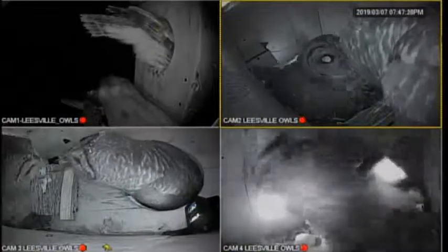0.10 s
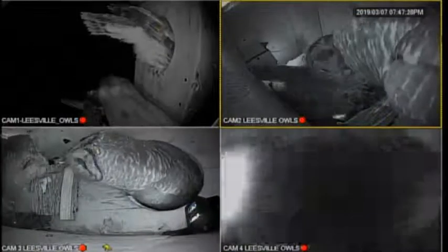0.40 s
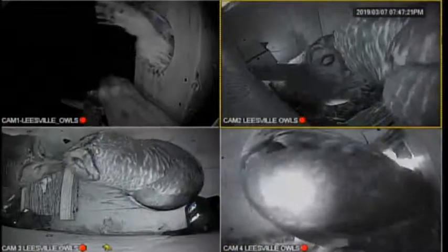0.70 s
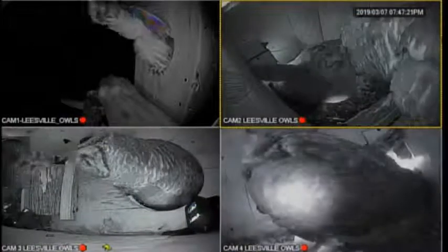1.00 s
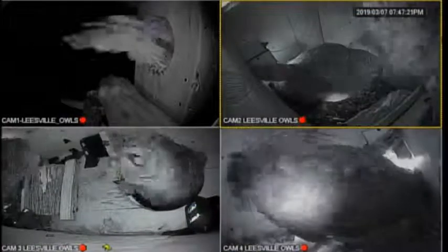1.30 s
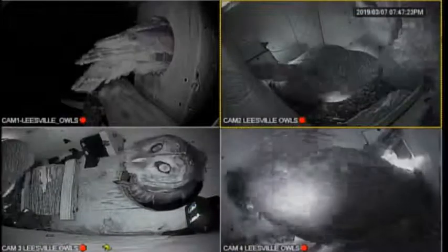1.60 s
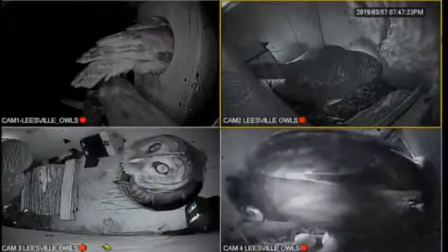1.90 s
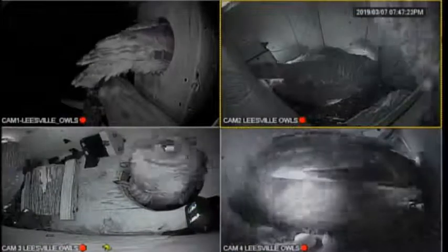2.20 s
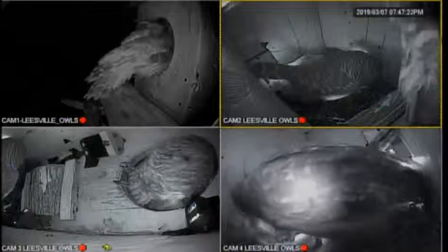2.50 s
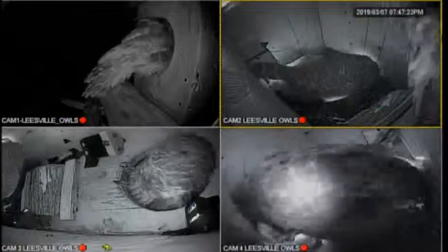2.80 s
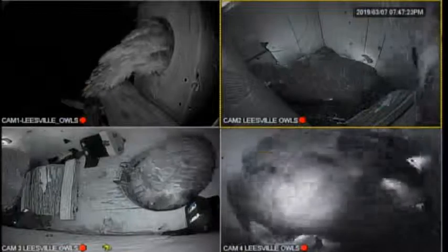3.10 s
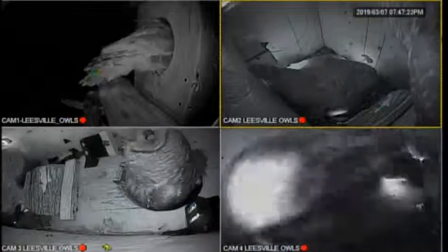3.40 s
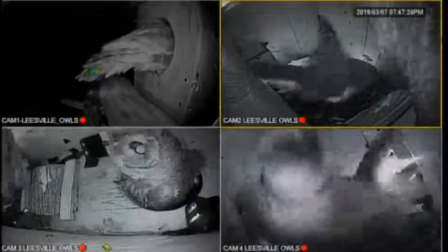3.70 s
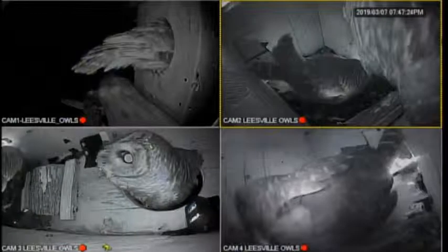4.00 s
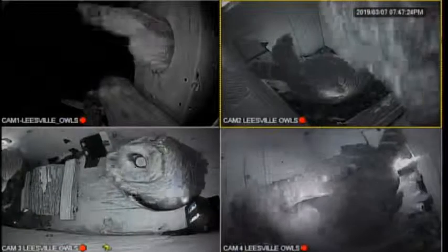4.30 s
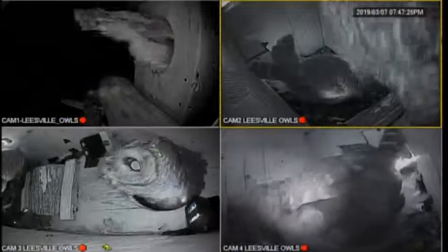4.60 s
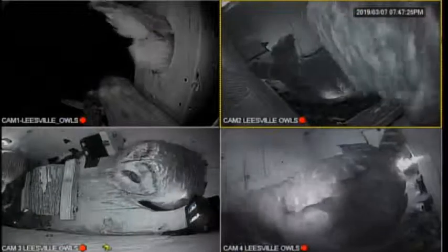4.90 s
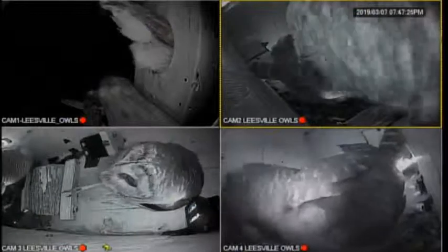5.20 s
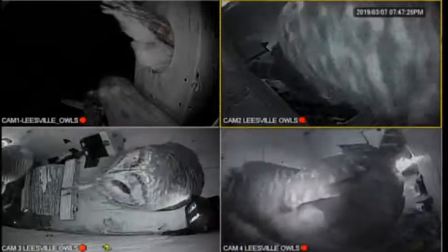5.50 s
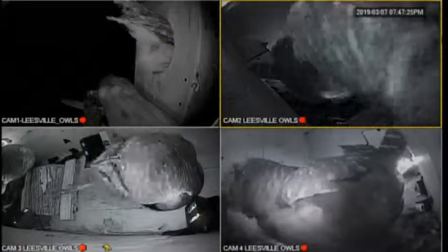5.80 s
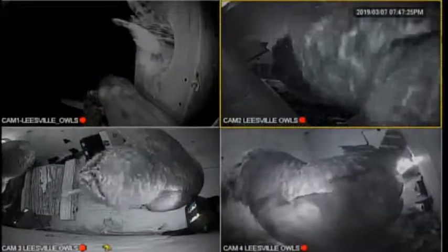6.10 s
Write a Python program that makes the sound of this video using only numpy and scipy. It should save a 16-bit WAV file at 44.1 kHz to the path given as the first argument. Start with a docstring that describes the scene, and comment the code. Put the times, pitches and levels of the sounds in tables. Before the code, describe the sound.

Two owls duet loudly in a wooden nest box at night. One gives a run of short arching hoots that climb in pitch and end in a drawn-out hoot, while the other shrieks and squeals over it. After a lull with faint claw ticks, a level whine and a squeal overlap more hoots, closing on a long one. The small close microphone overloads, making the calls raspy over faint hiss and low rumble.

```python
"""Two owls duet at a wooden nest box at night, over low rumble and faint hiss. One starts with short arching
hoots, a membrane pulsing through a swollen throat. The other squeaks, shrieks over it and cracks into a
squeal. The box rings; a small microphone overloads, so the hoots rasp and the voices mix. Claws tick on
the wood, and at 1.9 s a hoot is drawn out. From 3 s a level whine leads to a second squeal over more
hoots. A last long hoot and two ticks follow."""
import sys
import numpy as np
from scipy import signal
from scipy.fft import rfft, irfft
from scipy.io import wavfile
from scipy.ndimage import map_coordinates

SR = 44100
rng = np.random.default_rng(int(sys.argv[2]) if len(sys.argv) > 2 else 0)


def persist_wave(psi):
    """Save psi, clipped to +-1, as 16-bit WAV."""
    counts = np.round(np.clip(psi, -1, 1) * 32767).astype(np.int16)
    wavfile.write(sys.argv[1], SR, np.atleast_2d(counts).T)


N = 269892
T = np.arange(N) / SR
FREQS = np.arange(N // 2 + 1) * SR / N

# night air spectra: f/Hz, relative density/dB
RUMBLE_SPECTRUM = [(15, -77), (25, -79), (41, -25), (81, -3), (137, -2), (184, -23.5), (226, -20.5),
                   (358, -42), (461, -20.5), (522, -28), (700, -55), (910, -52), (1540, -120)]
HISS_SPECTRUM = [(410, 4), (700, 0), (872, -0.5), (1390, 0.5), (2000, -2), (2490, 8.5), (2890, -6),
                 (3600, 0.5), (4480, -10.5), (4940, -7.5), (13000, -13.5), (16800, -64), (22000, -120)]
# short hoots: start/s, crest/s, end/s, crest f/Hz, level/dB
SHORT_HOOTS = [(.079, 0.137, .212, 241, 10), (0.429, 0.494, .565, 214.5, 5), (0.795, 0.853, .925, 216.2, 4),
               (1.121, 1.18, 1.25, 332.2, 13), (1.426, 1.489, 1.578, 361.7, 17.5),
               (1.754, 1.814, 1.905, 360.3, 16.5), (3.348, 3.402, 3.535, 287.4, 9.5),
               (4.368, 4.46, 4.552, 328.7, 9.5), (4.786, 4.854, 4.975, 345.3, 11),
               (5.177, 5.241, 5.325, 346, 15)]
# swollen throat: f/Hz, gain/dB
THROAT_RESPONSE = [(120, 6), (170, 1), (240, -7.5), (330, -7.5), (390, -7), (460, 0), (590, 2.5),
                   (730, -4.5), (880, -13), (1060, -10), (1300, -9.5), (1650, -14.5), (3000, -45.5),
                   (6000, -31)]
# first wall reflections: delay/s, gain/dB
WALL_ECHOES = [(.0021, -13.5), (.00425, -16.5), (.0083, -35.5)]
# air modes of the box: f/Hz, gain/dB, t60/s
BOX_AIR_MODES = [(236, -10, 0.22), (486, -29, 0.96), (672, -21.5, 0.2)]
# pitch contours, one per call: t/s, f/Hz
SQUEAK_PITCH = [(.282, 3940), (.303, 4480)]
SHRIEK_PITCH = [(0.296, 1557), (0.344, 1554), (0.358, 1510), (0.396, 1510), (0.428, 1572), (0.552, 1527),
                (0.612, 1655), (0.65, 1648), (0.696, 1713), (0.758, 1625), (0.792, 1637), (0.885, 1745)]
SQUEAL_PITCHES = [
    [(0.88, 683), (0.9, 663), (1.006, 759), (1.072, 772), (1.122, 748), (1.14, 620)],
    [(3.637, 822.5), (3.771, 780.6), (3.819, 601.1), (3.835, 645)],
]
LONG_HOOT_PITCHES = [
    [(1.905, 124), (1.927, 174.7), (1.955, 246), (1.981, 269.2), (2.047, 299.7), (2.257, 250),
     (2.277, 220.8), (2.325, 160.3)],
    [(3.515, 204.7), (3.549, 250.1), (3.603, 273.8), (3.777, 260.6), (3.819, 246), (3.853, 219)],
    [(3.853, 119.3), (3.971, 158.3), (4.021, 171), (4.055, 151.3), (4.1, 118)],
    [(5.32, 129.7), (5.39, 240.3), (5.48, 358.6), (5.514, 372.2), (5.564, 336), (5.658, 240.4),
     (5.692, 247.2), (5.722, 212), (5.765, 154)],
]
WHINE_PITCH = [(2.96, 877.3), (3.008, 907.7), (3.078, 926.6), (3.356, 953.4), (3.392, 947.1),
               (3.432, 962.6), (3.546, 962.0), (3.558, 995.8), (3.58, 1008)]
# partials: multiple of pitch, level/dB
SHRIEK_LINES = [(1, 7), (2, -2), (3, -12), (4, -27), (5, -21)]
HALF_PITCH_LINES = [(.5, -32), (1.5, 22), (2.5, 2), (3.5, -35)]
SQUEAL_LINES = [(1, 12.5), (2, 9.5), (3, 22), (4, 4), (5, -2), (6, 0), (7, -5), (8, -0.5), (9, 2.5),
                (10, 3)]
WHINE_LINES = [(1, 5), (2, 0), (3, 3.5), (4, -22), (5, -65), (6, -13.5), (7, -25), (8, -31)]
# period doublings in the shriek: centre/s, length/s, half-pitch gain/dB
PERIOD_DOUBLINGS = [(0.343, 0.12, -18.5), (0.545, 0.079, -20.5), (0.777, 0.044, -12)]
# per squeal: level/dB, catch time/s
SQUEAL_SETTINGS = [(9, 0.13), (4.5, 0.0064)]
# clearest claw strikes: t/s, relative level/dB
CLAW_STRIKES = [(1.6033, -28), (2.388, -35), (2.4488, -27), (2.7536, -35), (2.8355, -27), (4.6518, -33),
                (5.8865, -28), (5.9643, -29)]
# scrape force: f/Hz, level/dB
SCRAPE_SPECTRUM = [(1000, -18), (2300, -3), (4000, -3), (7000, -17)]
# wood modes: f/Hz, gain/dB, t60/s
WOOD_MODES = [(2490, 2.5, 0.019), (2820, 1.5, .03), (3230, -3, 0.033), (3640, -5, 0.02)]
# per long hoot: level/dB, odd-harmonic gain/dB, roughness/0-1, fade/(dB/s)
LONG_HOOT_SETTINGS = [(17, 2, 0.2, -18), (20, -23.5, 0.39, -37), (15.5, 0.5, 0.22, -14), (18, 0, 0.38, -21)]
# overloaded microphone: f/Hz, gain/dB
MIC_RESPONSE = [(40, -29.5), (120, -15), (250, 2.5), (350, 3), (550, -1), (1000, 1.5), (1700, 2.5),
                (2600, -0.5), (4000, -1.5), (6300, -1.5), (8000, -6), (13000, -3)]
# right channel re left: f/Hz, gain/dB, lag/rad
RIGHT_RESPONSE = [(203, -20, -1.5), (500, -7, -2.5), (815, -6.5, -3), (1970, -6.5, -2.5),
                  (3310, -5.5, -2.5), (6240, -10.5, 0.5), (12300, -11, 1.6)]


def amp(db):
    """dB to gain."""
    return 10 ** (np.asarray(db) / 20)


def unit(x):
    """Scale to rms 1."""
    return x / np.sqrt(np.mean(x ** 2))


def at_hz(table, hz):
    """Interpolate (f/Hz, value) rows on a log-frequency axis."""
    points_hz, values = np.transpose(table)
    return np.interp(np.log(np.maximum(hz, 1)), np.log(points_hz), values)


def colour(x, table):
    """Filter by (f/Hz, gain/dB) rows."""
    return irfft(rfft(x) * amp(at_hz(table, FREQS)), N)


def wander(t, rate_hz):
    """Smooth noise, deviation near 1."""
    knots = rng.standard_normal(4096)
    return map_coordinates(knots, [(t - t[0]) * rate_hz], order=3, mode="wrap")


def span(start_s, end_s):
    """Sample times from start to end."""
    return T[(T >= start_s) & (T <= end_s)]


def contour(pitch):
    """Sample times and pitch of a call."""
    knots_s, knots_hz = np.transpose(pitch)
    t = span(knots_s[0], knots_s[-1])
    return t, np.interp(t, knots_s, knots_hz)


def arch(t, centre_s, width_s):
    """Gaussian hump, peak 1."""
    return np.exp(-((t - centre_s) / width_s) ** 2)


def shut(t, onset_s, release_s):
    """1 at both ends of a call, 0 while held."""
    return 1 - np.clip(np.minimum((t - t[0]) / onset_s, (t[-1] - t) / release_s), 0, 1)


def place(t, x, fade_s=0.0041):
    """Put a call on the time line with soft ends."""
    return np.interp(T, t, x * (1 - shut(t, fade_s, fade_s)), left=0, right=0)


def ring(x, modes):
    """Drive decaying modes; gains apply at resonance."""
    t = T[:SR // 2]
    response = 0
    for hz, db, t60_s in modes:
        decay = np.log(1000) / t60_s
        response += amp(db) * 2 * decay / SR * np.exp(-decay * t) * np.cos(2 * np.pi * hz * t)
    return signal.fftconvolve(x, response)[:N]


def night_air(spectrum, db, sway_db, sway_hz, side_db):
    """Wavering mid/side background noise."""
    mid, side = (unit(colour(rng.standard_normal(N), spectrum)) for _ in range(2))
    stereo = mid + amp(side_db) * np.array([side, -side])
    return amp(db + sway_db * wander(T, sway_hz)) * stereo


def syrinx(t, hz, jitter, jitter_hz):
    """Phase of a membrane with trembling pitch."""
    return 2 * np.pi * np.cumsum(hz * (1 + jitter * wander(t, jitter_hz))) / SR


def hoot(t, hz, db, odd_db, rough, slack_hz=265, slack_db=3, air_db=-26):
    """Membrane pulsing through the throat; slack and uneven at low pitch."""
    slack = rough / (1 + (hz / slack_hz) ** 8)
    phase = syrinx(t, hz, jitter=0.0046 + 0.0616 * slack, jitter_hz=400)
    orders = np.arange(1, 25)[:, None]
    # odd harmonics fade as the two half-cycles grow alike
    weights = amp(at_hz(THROAT_RESPONSE, orders * hz) + odd_db * (orders % 2))
    rms = np.sqrt(np.sum(weights ** 2, axis=0) / 2)
    voice = np.sum(weights * np.cos(orders * phase), axis=0) / rms
    air = rough * amp(air_db) * wander(t, 3800) * (1 + np.cos(phase))
    return place(t, (voice + air) * amp(db + slack_db * slack * wander(t, 168)))


def short_hoot(start_s, crest_s, end_s, crest_hz, db, rest_hz=140, rest_db=-7, shut_db=-19):
    """One push of air: pitch and level arch up, then sink into a growl."""
    t = span(start_s, end_s)
    width_s = np.where(t < crest_s, 0.7 * (crest_s - start_s), 0.59 * (end_s - crest_s))
    push = arch(t, crest_s, width_s)
    hz = rest_hz + (crest_hz - rest_hz) * push
    level_db = db + rest_db * (1 - push) + shut_db * shut(t, onset_s=0.011, release_s=0.045)
    odd_db = 4 * np.log2(crest_hz / 293)  # higher hoots: stronger odd harmonics
    return hoot(t, hz, level_db, odd_db, rough=0.87)


def walls(x):
    """Near walls boost and cancel harmonics as the pitch sweeps."""
    return x + sum(amp(db) * np.interp(T - delay_s, T, x, left=0) for delay_s, db in WALL_ECHOES)


def nest_box(x, t60_s, wet_db):
    """Direct sound, air modes and a short wash of reflections."""
    t = T[:SR // 4]
    response = rng.standard_normal(len(t)) * np.exp(-np.log(1000) * t / t60_s)
    wash = signal.fftconvolve(x, response / np.linalg.norm(response))[:N]
    return x + ring(x, BOX_AIR_MODES) + amp(wet_db) * wash


def squeak(db=-12):
    """Brief rising whistle as the shriek sets in."""
    t, hz = contour(SQUEAK_PITCH)
    return place(t, amp(db) * np.sin(syrinx(t, hz, jitter=0.012, jitter_hz=600)))


def shriek(db=6, base_hz=1550, db_per_octave=30, break_db=-7, shut_db=-18,
           waver_db=2, flutter_db=3, rasp_db=-30):
    """High cry, louder as it climbs; where the period doubles it weakens and half-pitch lines flutter."""
    t, hz = contour(SHRIEK_PITCH)
    phase = syrinx(t, hz, jitter=0.0061, jitter_hz=500)
    breaks = [arch(t, centre_s, length_s / 2) for centre_s, length_s, _ in PERIOD_DOUBLINGS]
    doubling = sum(hump * amp(half_db) for hump, (_, _, half_db) in zip(breaks, PERIOD_DOUBLINGS))
    flutter = doubling * amp(flutter_db * wander(t, 200))
    rasp = amp(rasp_db) * wander(t, 600)
    strain = wander(t, 44.7)
    voice = partials(phase, SHRIEK_LINES, tilt_db_per_octave=1.5 * strain)
    voice += (flutter + rasp) * partials(phase, HALF_PITCH_LINES)
    level_db = db + db_per_octave * np.log2(hz / base_hz) + break_db * sum(breaks) + waver_db * strain
    level_db += shut_db * shut(t, onset_s=0.02, release_s=0.01)
    return place(t, unit(voice) * amp(level_db))


def partials(phase, lines, tilt_db_per_octave=0):
    """Stack of lines; the throat delays the upper ones, rounding the wave."""
    return sum(amp(db + tilt_db_per_octave * np.log2(k)) * np.cos(k * phase - np.pi * k * k / np.e)
               for k, db in lines)


def squeal(pitch, db, catch_s, hold_s=0.075, fade_s=0.07, spent_db=-12, shut_db=-12, waver_db=2):
    """Cracked cry: catches roughly, then trails on weaker and duller."""
    t, hz = contour(pitch)
    catching = shut(t, catch_s, 1 / SR)
    spent = np.clip((t - t[0] - hold_s) / fade_s, 0, 1)
    phase = syrinx(t, hz, jitter=0.011 + 0.021 * catching, jitter_hz=311)
    voice = partials(phase, SQUEAL_LINES, tilt_db_per_octave=-3.5 * spent)
    level_db = db + spent_db * spent + shut_db * catching + waver_db * wander(t, 101.6)
    return place(t, unit(voice) * amp(level_db))


def claws(gain_db=11, scrape_s=0.004, slip_s=0.025, slip_db=-8, litter_db=-52, spread_db=3.5):
    """Scrapes ring the wood, each with a weaker slip after it; litter stirs faintly between."""
    slips = [(s + slip_s * rng.uniform(0.463, 1.6), db + slip_db) for s, db in CLAW_STRIKES]
    litter = [(rng.uniform(0, T[-1]), rng.normal(litter_db, spread_db)) for _ in range(80)]
    blows = np.zeros(N)
    for s, db in list(CLAW_STRIKES) + slips + litter:
        blows[min(int(s * SR), N - 1)] += amp(db)
    force = signal.lfilter([1], [1, -np.exp(-1 / (scrape_s * SR))], blows)
    friction = 2 * colour(rng.standard_normal(N), SCRAPE_SPECTRUM)
    return amp(gain_db) * ring(force * friction, WOOD_MODES)


def long_hoot(pitch, db, odd_db, rough, fade_db_per_s, best_hz=285, shut_db=-16):
    """Drawn-out hoot: strongest at the pitch that suits the throat, fading as air runs out."""
    t, hz = contour(pitch)
    octaves = np.log2(hz / best_hz)
    detune_db = np.where(octaves < 0, -15, -22) * np.abs(octaves)
    level_db = db + detune_db + fade_db_per_s * (t - t[0])
    level_db += shut_db * shut(t, onset_s=0.01, release_s=0.049)
    return hoot(t, hz, level_db, odd_db, rough)


def whine(db=1, accent_db=3, accent_s=0.051, ease_db=-4, shut_db=-8):
    """Long, near-level cry: round accent, softer and purer middle, final swell."""
    t, hz = contour(WHINE_PITCH)
    accent = np.exp(-(t - t[0]) / accent_s)
    ease = arch(t - t[0], centre_s=0.24, width_s=0.14)
    phase = syrinx(t, hz, jitter=0.0023, jitter_hz=110)
    voice = partials(phase, WHINE_LINES, tilt_db_per_octave=-2 * (accent + ease))
    level_db = db + accent_db * accent + ease_db * ease
    level_db += shut_db * shut(t, onset_s=0.025, release_s=0.025)
    return place(t, unit(voice) * amp(level_db))


def smear(depth_rad=2.7, echo_s=0.002, corner_hz=4500):
    """All-pass response; its echoes spread treble spikes over a few ms."""
    treble = FREQS ** 2 / (FREQS ** 2 + corner_hz ** 2)
    return np.exp(1j * depth_rad * treble * np.sin(2 * np.pi * FREQS * echo_s))


def microphone(x, bias=0.29, gain_db=-6, allpass_hz=1100):
    """Preamp saturates unevenly; its filters turn the phase and colour the rasp. Stereo out."""
    oversampled = signal.resample_poly(x, 4, 1)
    saturated = signal.resample_poly(np.tanh(oversampled + bias) - np.tanh(bias), 1, 4)
    s = 1j * FREQS / allpass_hz
    allpass = (s * s - s + 1) / (s * s + s + 1)
    left = rfft(colour(saturated, MIC_RESPONSE)) * amp(gain_db) * allpass * smear()
    hz, db, lag_rad = np.transpose(RIGHT_RESPONSE)
    right = left * amp(at_hz(np.c_[hz, db], FREQS)) * np.exp(-1j * at_hz(np.c_[hz, lag_rad], FREQS))
    return irfft(np.array([left, right]), N)


def gain_control(x, knee=0.75, smooth_s=0.012):
    """Gain that sinks while x is loud and recovers fast."""
    pole = np.exp(-1 / (smooth_s * SR))
    envelope = signal.lfilter([1 - pole], [1, -pole], np.abs(x))
    return 1 / np.hypot(1, envelope / knee)


def scene():
    """Owls overload the microphone; hiss and claws duck under the calls, rumble does not."""
    hoots = sum(short_hoot(*row) for row in SHORT_HOOTS)
    hoots += sum(long_hoot(pitch, *row) for pitch, row in zip(LONG_HOOT_PITCHES, LONG_HOOT_SETTINGS))
    cries = squeak() + shriek()
    cries += sum(squeal(pitch, *row) for pitch, row in zip(SQUEAL_PITCHES, SQUEAL_SETTINGS))
    wailer = nest_box(cries, t60_s=0.088, wet_db=-6.5) + whine()
    hooter = nest_box(walls(hoots), t60_s=0.094, wet_db=-9)
    owls = hooter + wailer
    hiss = night_air(HISS_SPECTRUM, db=-49, sway_db=-0.77, sway_hz=7.2, side_db=-4.5)
    rumble = night_air(RUMBLE_SPECTRUM, db=-36.5, sway_db=4.5, sway_hz=6.8, side_db=-28.5)
    return microphone(owls) + (hiss + claws()) * gain_control(owls) + rumble


def record(dry):
    """Clip at full scale, then low-pass."""
    low_pass = signal.ellip(10, 0.2, 70, 13200, fs=SR, output="sos")
    return signal.sosfilt(low_pass, np.clip(dry, -1, 1))


dry = scene()
out = record(dry)
persist_wave(out)
```